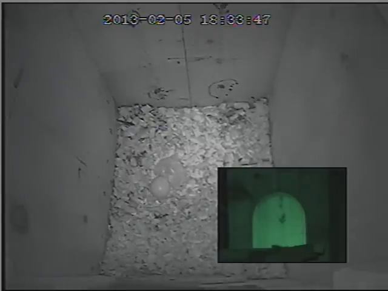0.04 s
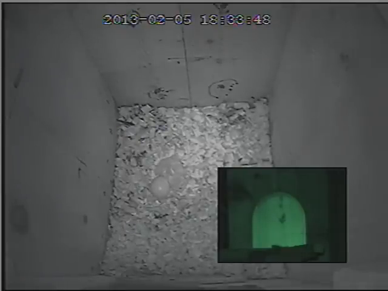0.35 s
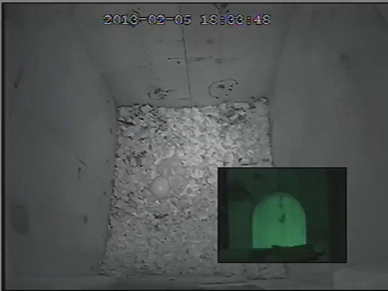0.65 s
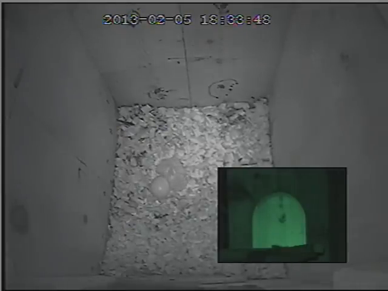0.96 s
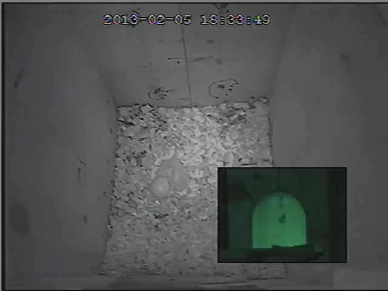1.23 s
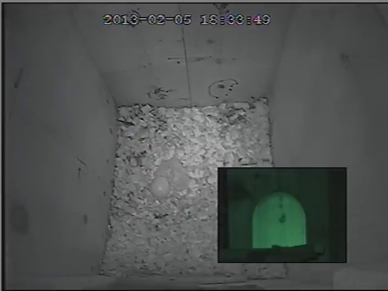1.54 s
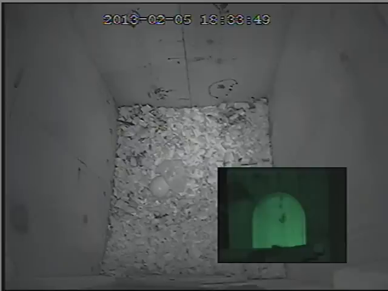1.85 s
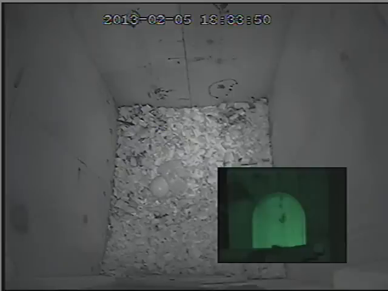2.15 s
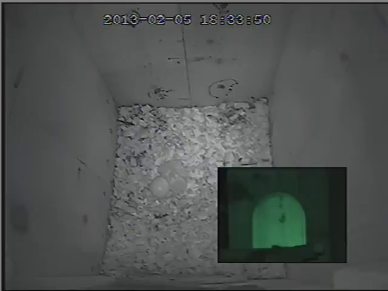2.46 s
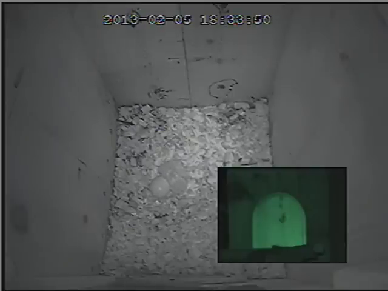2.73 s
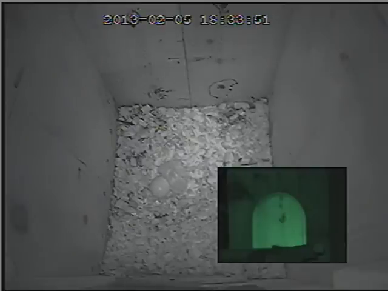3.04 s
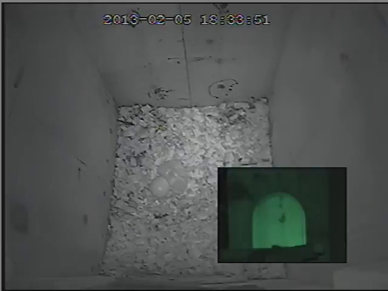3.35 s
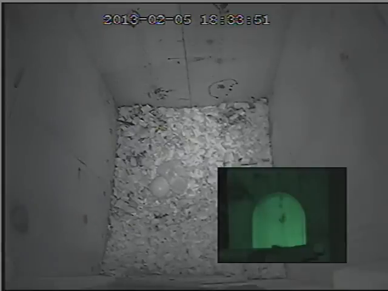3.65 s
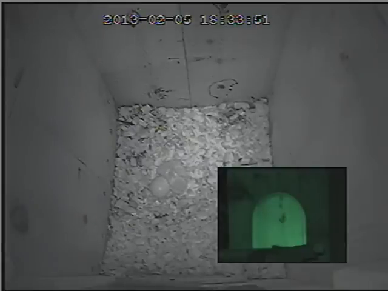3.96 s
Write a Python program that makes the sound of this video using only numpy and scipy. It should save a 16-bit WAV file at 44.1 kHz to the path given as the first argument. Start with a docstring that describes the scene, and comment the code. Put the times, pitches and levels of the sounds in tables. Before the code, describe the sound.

An owl screeches at once in a wooden nest box, a high whistle fraying into a harsh rasp and sliding down by 0.7 seconds. Feathers softly brush the wood from about 0.9 to 2.8 seconds, and a claw ticks near 3.2. A cricket gives double chirps roughly every half second throughout, over fainter crickets, soft hiss and a low distant traffic drone that slowly grows.

```python
"""An owl screeches at a wooden nest box: two whistling voices fray into a harsh rasp of air through
the throat, then one slides down cleanly. Afterwards its feathers brush the wood and a claw ticks on it.
A cricket chirps in pairs of wing strokes over a second cricket and a far chorus.
Behind them lie the low drone of distant traffic, faint whines and notes, and a soft hiss of air."""
import sys
import numpy as np
from scipy import signal
from scipy.fft import rfft, irfft
from scipy.io import wavfile
from scipy.ndimage import uniform_filter1d

SR = 44100
rng = np.random.default_rng(int(sys.argv[2]) if len(sys.argv) > 2 else 0)


def waveform_to_disk(signal):
    """Save audio, clipped to [-1, 1], as 16-bit WAV at the path in sys.argv[1]."""
    frames = np.transpose(np.atleast_2d(signal))
    scaled = np.clip(frames, -1, 1) * 32767
    samples = np.round(scaled).astype(np.int16)
    wavfile.write(sys.argv[1], SR, samples)


N = 176400
TIME = np.arange(N) / SR

# The owl's upper whistle. Each row: time in seconds, pitch in Hz, level in dB, roughness from 0 to 1.
UPPER_VOICE = [(0, 6407, -34, 0.12), (.036, 6480, -28.5, 0), (.048, 6730, -43, 0.23), (.058, 6770, -27, 0),
               (.082, 6900, -31.5, 0.11), (.11, 7090, -36.5, 0.02), (.134, 7030, -37.5, 0.24),
               (.146, 7100, -53, 0.43), (.155, 7200, -35, 0.7), (.168, 6890, -44, 0.7),
               (.2, 6810, -44, 0.38), (.24, 7240, -50.5, .5), (.275, 7260, -44.5, 0.5),
               (.287, 7600, -43, 0.54), (.34, 7530, -40.5, 0.3), (.375, 7970, -40, 0.3),
               (.41, 7190, -42, 1), (.447, 8200, -49, .6), (.483, 6780, -35, .6), (.517, 7650, -44, 0.25),
               (.56, 6900, -43, .5), (.583, 7420, -56.5, .2), (.596, 7640, -47, .12),
               (.612, 7100, -48, 0.3), (.628, 6200, -56, 0.26)]
# The lower whistle, which ends the call in a slide. Rows as for the upper one.
LOWER_VOICE = [(0, 4780, -47, .6), (.017, 4645, -41, .08), (.036, 4680, -37, .05), (.047, 4900, -42, .15),
               (.064, 4995, -36, .04), (.074, 4650, -45, .4), (.085, 4570, -35, .05), (.14, 4650, -37, .1),
               (.18, 4720, -40, .75), (.235, 4750, -44, .9), (.278, 5120, -38, .5), (.31, 4650, -42, .7),
               (.36, 5150, -48, .9), (.45, 5350, -48, .8), (.545, 5750, -54, .9), (.562, 5520, -37, .5),
               (.578, 6050, -37, .2), (.594, 6180, -46, .02), (.604, 6020, -34, .02), (.616, 5650, -37, .1),
               (.626, 5000, -30, .1), (.644, 4300, -31, .05), (.657, 3900, -24, .03),
               (.673, 3640, -35, .03), (.686, 3390, -27, .02), (.692, 3260, -33, .02),
               (.714, 3070, -38, .02)]
# Stray whistles where the voices split. One list per whistle, with rows as above.
STRAY_WHISTLES = [
    [(0, 4160, -48, 0.4), (.03, 4084, -39.5, 0), (.08, 4320, -61, .4)],
    [(.156, 8200, -52, .4), (.175, 7540, -47, .6), (.21, 7480, -48, 1.1), (.232, 7950, -52, .6),
     (.246, 7750, -52, .8), (.27, 8200, -47, .6)],
    [(.312, 6660, -53, 0.32), (.32, 6450, -44, 0.4), (.332, 5850, -48, .6), (.385, 5300, -50, .7)],
    [(.546, 6760, -54, 0.35), (.553, 6250, -39, 0.5), (.566, 5600, -37, 0.57)],
]
# The octave over the slide. Each row: time in seconds, level in dB relative to the lower voice.
SLIDE_OCTAVE = [(.6, -55), (.633, -46), (.641, -25), (.655, -35), (.675, -50)]
# The rasp's envelope. Each row: time in seconds, level in dB.
RASP_ENVELOPE = [(0, -50), (.06, -48), (.09, -58), (.14, -51.5), (.158, -46), (.235, -47.5), (.254, -38),
                 (.31, -47.5), (.33, -37.5), (.384, -42), (.412, -35), (.44, -30), (.454, -43.5),
                 (.481, -32), (.495, -35), (.514, -37), (.522, -31.5), (.538, -33.5), (.564, -33.5),
                 (.584, -61), (.6, -73), (.612, -49), (.635, -66)]
# Throat and box resonances in the rasp. Each row: centre in Hz, width in Hz, relative gain in dB.
RASP_FORMANTS = [(1290, 540, -10.5), (1783, 57, 3.5), (1890, 94, 5), (2150, 250, -1), (2510, 72, -3),
                 (2720, 41, -1), (3014, 136, -2), (3450, 140, -10), (3884, 130, -5.5), (4520, 430, -6.5),
                 (5230, 2100, -15.5), (5800, 330, -24), (7470, 670, -16.5)]
# Sharp catches in the rasp. Each row: start in seconds, peak level in dB.
CATCHES = [(.2525, -33), (.4806, -30), (.5208, -22), (.527, -29)]
# Slap off the box walls. Each row: delay in seconds, gain in dB.
BOX_ECHOES = [(.0029, -27), (.0052, -7), (0.0117, -15)]
# The hollow ring of the box. Each row: centre in Hz, width in Hz, gain in dB.
BOX_MODES = [(315, 23, -4), (459, 32, 2), (756, 38, -7), (1064, 37, -2), (1188, 50, -4.5), (1430, 35, -3.5),
             (1779, 19, -1), (2135, 23, -5), (2490, 13, -9)]

# The bird's shuffles. Each row: peak time and half length in seconds, body and scrape levels in dB.
SHUFFLES = [(0.939, 0.0045, -50.5, -64), (1.025, 0.064, -53, -60.5), (1.282, 0.0036, -65, -60),
            (1.516, 0.011, -64, -53.5), (1.531, 0.047, -48.5, -55.5), (1.625, 0.025, -51.5, -62.5),
            (1.729, 0.018, -53, -66), (1.91, 0.022, -51.5, -64), (2.066, 0.037, -56, -73),
            (2.13, 0.0065, -59.5, -64), (2.224, 0.05, -55.5, -67), (2.41, 0.017, -56, -77),
            (2.765, 0.0045, -67, -62)]
# The soft body of a shuffle. Each row: frequency in Hz, relative level in dB.
FEATHER_SPECTRUM = [(200, -3.5), (600, 4.5), (1400, 3.5), (2500, -3), (4000, -9), (7000, -36)]
# Its bright scrape. Each row: frequency in Hz, relative level in dB.
SCRAPE_SPECTRUM = [(3000, 7), (5000, 3.5), (7500, 3), (8600, -1), (10500, -12)]
# Claw on wood. Each row: start in seconds, level in dB.
CLAW_TICKS = [(3.1555, -46.5), (3.231, -39), (3.2342, -52)]
# A tick's dry attack. Each row: frequency in Hz, relative level in dB.
CRACK_SPECTRUM = [(400, -5), (1100, -10), (2000, -7), (4000, -14), (7000, -31)]
# The board's ring. Each row: pitch in Hz, level in dB relative to the tick, seconds to fall 60 dB.
WOOD_MODES = [(530, -3, 0.047), (690, -4, .012), (830, 5, 0.013), (1080, 0, .011), (1750, -3, 0.013),
              (2800, -14, 0.012)]

# The near cricket's wing strokes, two to a chirp. Each row: start in seconds, level in dB.
NEAR_STROKES = [(.312, -32), (.386, -32), (.831, -31), (.905, -33), (1.32, -32), (1.394, -33),
                (1.779, -30.5), (1.853, -31.5), (2.24, -32), (2.314, -30.5), (2.70, -32), (2.773, -33.5),
                (3.171, -32), (3.246, -32), (3.616, -33), (3.689, -32)]
# The far cricket's chirps. Each row: start in seconds, level in dB.
FAR_CHIRPS = [(1.13, -54), (1.67, -58), (2.53, -55), (3.35, -58), (3.84, -54)]
# One wing stroke. Each row: time into the stroke in seconds, pitch in Hz, relative level in dB.
STROKE_SHAPE = [(0, 4940, -5), (.003, 4930, -6), (.012, 4985, -3.3), (.022, 5020, -1.6), (.029, 5045, -4.5),
                (.034, 5010, -9), (.039, 4900, -18)]
# The wash of many far crickets. Each row: frequency in Hz, relative level in dB.
CHORUS_SPECTRUM = [(4300, -23), (4620, -12), (4780, -8), (4980, -4), (5170, -7), (5380, -11), (5600, -46.5)]

# An engine drawing nearer. Each row: time in seconds, level in dB.
ENGINE_ENVELOPE = [(0, -63), (1.1, -46.5), (1.5, -47), (2.2, -43), (2.7, -38.5), (3.2, -35.5), (4, -35.5)]
# Other traffic drones. Each row: pitch in Hz, level in dB.
TRAFFIC_HUMS = [(83, -51), (118.5, -45.5), (166.3, -46), (222, -56.5), (644, -69.5)]
# The traffic's low bed. Each row: frequency in Hz, relative level in dB.
RUMBLE_SPECTRUM = [(20, -12), (50, -13), (70, -6), (90, -2.5), (120, -6.5), (140, 1), (165, 4.5),
                   (195, -7.5), (250, -12), (340, -16.5), (500, -47.5)]
# Far-off whines. Each row: pitch in Hz, level in dB.
WHINES = [(705, -67), (1060, -70), (1215, -72)]
# Short distant notes. Each row: peak time in seconds, pitch in Hz, level in dB.
FAR_NOTES = [(2.405, 748, -56), (3.17, 770, -56)]
# The steady hiss of air. Each row: frequency in Hz, relative level in dB.
AIR_SPECTRUM = [(100, 10), (350, -1), (500, 0.5), (650, -3.5), (900, -5), (1200, -6), (1600, -9),
                (2500, -11.5), (4000, -16.5), (6000, -19), (7000, -21), (8050, -17), (8400, -28),
                (9300, -27.5), (10500, -36)]


def owl():
    """The screech: two coupled voices, stray whistles and the rasp; the final slide gains an octave."""
    upper, lower = voice(UPPER_VOICE), voice(LOWER_VOICE)
    octave = from_db(envelope(SLIDE_OCTAVE)[0]) * lower * np.exp(1j * np.angle(lower))
    # The voices multiply into a difference tone, which the throat favours.
    difference = from_db(21) * resonate((upper * np.conj(lower)).real, hz=1780, width=530)
    strays = sum(voice(rows) * (1 - until(rows[0][0])) for rows in STRAY_WHISTLES)
    whistles = (upper + lower + octave + strays).real + difference
    return box_slap(whistles) + rasp() + catches()


def voice(rows, fray_rate_hz=360, sputter_db=4.5, jitter_hz=130, top_hz=9200):
    """One side of the syrinx: a whistle that shakes, sputters and frays into noise as it roughens."""
    hz, db, roughness = envelope(rows)
    roughness = np.clip(roughness, 0, 1)
    fray = 1 + roughness * (drift(fray_rate_hz) + 1j * drift(fray_rate_hz))
    fray *= from_db(sputter_db * np.sqrt(roughness) * drift(110))
    fray /= np.sqrt(uniform_filter1d(np.abs(fray) ** 2, size=1100))  # hold the level, keep the grit
    shaky_hz = hz + roughness * jitter_hz * drift(320)
    whistle = from_db(db) * until(rows[-1][0]) * fray * tone(shaky_hz)
    return signal.sosfilt(signal.butter(10, top_hz, fs=SR, output="sos"), whistle)


def rasp(rattle_hz=122, rattle_db=1, flutter_db=0.5, band_hz=(930, 7500)):
    """Uneven puffs of chaotic airflow ring the resonances of throat and box."""
    rattle = tone(rattle_hz * (1 + 0.2 * drift(41))).real
    airflow = rng.standard_normal(N) * from_db(flutter_db * drift(110) + rattle_db * rattle)
    hiss = sum((-1) ** k * from_db(db) * resonate(airflow, hz, width)
               for k, (hz, width, db) in enumerate(RASP_FORMANTS))
    hiss = signal.sosfilt(signal.butter(4, band_hz, "band", fs=SR, output="sos"), hiss)
    hiss /= np.sqrt(uniform_filter1d(hiss ** 2, size=600))  # flatten, so the envelope sets the level
    return hiss * from_db(envelope(RASP_ENVELOPE)[0]) * until(RASP_ENVELOPE[-1][0])


def catches(ring_hz=1940, rise_s=0.0012):
    """Single hard puffs briefly ring the throat's main resonance."""
    out = np.zeros(N)
    for start, db in CATCHES:
        age = np.clip(TIME - start, 0, 1)
        puff = age / rise_s * np.exp(1 - age / rise_s)
        out += from_db(db) * puff * np.sin(2 * np.pi * ring_hz * age)
    return out


def box_slap(x):
    """Adds short reflections between the wooden walls."""
    return x + sum(from_db(db) * np.interp(TIME - delay, TIME, x, left=0) for delay, db in BOX_ECHOES)


def box_ring(x):
    """The box's resonances turn a noise hollow; unit power."""
    return unit_power(x + sum(from_db(db) * resonate(x, hz, width) for hz, width, db in BOX_MODES))


def shuffles(grain_db=2.5):
    """Feathers brush the wood in soft, grainy swells, some with a bright scrape."""
    grain = unit_power(from_db(grain_db * drift(180)))
    body, scrape = box_ring(noise(FEATHER_SPECTRUM)), noise(SCRAPE_SPECTRUM)
    return grain * sum(swell(peak, half) * (from_db(body_db) * body + from_db(scrape_db) * scrape)
                       for peak, half, body_db, scrape_db in SHUFFLES)


def claw(crack_db=-5.5, crack_t60_s=0.018):
    """A claw taps the board: a dry crack and a short woody ring."""
    out, crack = np.zeros(N), noise(CRACK_SPECTRUM)
    for start, db in CLAW_TICKS:
        age = np.clip(TIME - start, 0, 1)
        out += (age > 0) * from_db(db + crack_db - 60 * age / crack_t60_s) * crack
        out += sum(from_db(db + mode_db - 60 * age / t60) * np.sin(2 * np.pi * hz * age)
                   for hz, mode_db, t60 in WOOD_MODES)
    return out


def crickets(far_gap_s=0.075, chorus_db=-57, throb_db=1.5):
    """A near cricket, a slightly lower one far off and the throbbing blur of many more."""
    far_strokes = [(start + k * far_gap_s, db) for start, db in FAR_CHIRPS for k in range(2)]
    chorus = from_db(chorus_db + throb_db * drift(6.4)) * noise(CHORUS_SPECTRUM)
    return cricket(NEAR_STROKES, pitch_ratio=1) + cricket(far_strokes, pitch_ratio=0.95) + chorus


def cricket(strokes, pitch_ratio, fade_s=0.003, jitter_hz=7.9, wobble_db=0.37):
    """Each wing stroke is a short, slightly rising tone, trailed by its echo from the garden."""
    chirps = np.zeros(N + SR)
    age = np.arange(int(STROKE_SHAPE[-1][0] * SR)) / SR
    hz, shape_db = envelope(STROKE_SHAPE, age)
    fades = np.sin(np.pi / 2 * np.clip(np.minimum(age, age[-1] - age) / fade_s, 0, 1)) ** 2
    jitter = jitter_hz * drift(100)
    for start, db in strokes:
        span = int((start - fade_s / 2) * SR) + np.arange(len(age))
        chirps[span] += fades * from_db(db + shape_db) * tone(hz * pitch_ratio + jitter[span % N]).real
    chirps = chirps[:N] * from_db(-wobble_db * drift(150))
    return chirps + garden_echo(chirps, hz.mean() * pitch_ratio)


def garden_echo(chirps, hz, wet_db=-11, t60_s=0.25, blur_hz=70):
    """A diffuse tail: narrow noise at the cricket's pitch dies away after each stroke."""
    decay = from_db(-60 / (t60_s * SR)) ** 2
    tail = np.sqrt(signal.lfilter([1 - decay], [1, -decay], chirps ** 2 + 1e-18))
    scatter = tone(np.full(N, hz)) * (drift(blur_hz) + 1j * drift(blur_hz))
    return from_db(wet_db) * tail * unit_power(scatter.real)


def traffic(engine_hz=109.3, swell_db=2, wander_hz=1.418, rumble_db=-43):
    """Wavering engine drones over a low rumble; one engine draws nearer."""
    engine = from_db(envelope(ENGINE_ENVELOPE)[0]) * tone(engine_hz + 0.52 * drift(1.5)).real
    hums = sum(from_db(db + swell_db * drift(7.7)) * tone(hz + wander_hz * drift(2.82)).real
               for hz, db in TRAFFIC_HUMS)
    return engine + hums + from_db(rumble_db) * noise(RUMBLE_SPECTRUM)


def far_tones(swell_db=3.5, wander_hz=7):
    """Faint whines come and go, and two short notes sound far away."""
    whines = sum(from_db(db + swell_db * np.tanh(drift(2.4))) * tone(hz + wander_hz * drift(2.01)).real
                 for hz, db in WHINES)
    notes = sum(from_db(db) * swell(peak, half_s=0.019) * tone(np.full(N, hz)).real
                for peak, hz, db in FAR_NOTES)
    return whines + notes


def air(level_db=-51):
    """A steady bed of hiss, coloured by the box."""
    return from_db(level_db) * box_ring(noise(AIR_SPECTRUM))


def from_db(db):
    """Decibels to gain."""
    return 10 ** (np.asarray(db) / 20)


def unit_power(x):
    """Scales a signal to an RMS of 1."""
    return x / np.sqrt(np.mean(x ** 2) + 1e-20)


def envelope(rows, t=TIME):
    """Straight ramps between timed breakpoints, one curve per value column."""
    times, *columns = np.transpose(rows)
    return [np.interp(t, times, column) for column in columns]


def until(end_s):
    """A gate that closes with a 10 ms fade."""
    return np.clip((end_s - TIME) / 0.01, 0, 1)


def swell(peak_s, half_s):
    """A bell-shaped fade in and out."""
    return np.exp(-0.5 * ((TIME - peak_s) / half_s) ** 2)


def drift(rate_hz):
    """Smooth random modulation, mostly slower than the given rate; unit power."""
    freqs = np.fft.rfftfreq(N, 1 / SR)
    return unit_power(irfft(rfft(rng.standard_normal(N)) / (1 + (freqs / rate_hz) ** 2), N))


def noise(spectrum):
    """Noise of a given colour, rolling off steeply beyond its ends; unit power."""
    hz, db = np.transpose(spectrum)
    freqs = np.fft.rfftfreq(N, 1 / SR) + 1e-3
    colour = from_db(np.interp(np.log(freqs), np.log(hz), db))
    skirts = np.minimum(1, np.minimum(freqs / hz[0], hz[-1] / freqs)) ** 4
    return unit_power(irfft(rfft(rng.standard_normal(N)) * colour * skirts, N))


def tone(hz):
    """A complex oscillator following a pitch curve; its real part has unit power."""
    return np.sqrt(2) * np.exp(2j * np.pi * (np.cumsum(hz) / SR + rng.random()))


def resonate(x, hz, width):
    """A resonant band-pass with unity gain at its peak."""
    radius = np.exp(-np.pi * width / SR)
    feedforward = np.array([1, 0, -1]) * (1 - radius ** 2) / 2
    feedback = [1, -2 * radius * np.cos(2 * np.pi * hz / SR), radius ** 2]
    return signal.lfilter(feedforward, feedback, x)


def scene():
    """The mono mix: the bird at its box, crickets and the evening background."""
    return (owl() + claw() + shuffles() + crickets() + traffic() + far_tones() + air())[None]


def record(dry):
    """A small microphone cuts the top end steeply."""
    cutoff_hz = 10700
    return signal.sosfilt(signal.ellip(10, 0.2, 70, cutoff_hz, fs=SR, output="sos"), dry)


dry = scene()
out = record(dry)
waveform_to_disk(out)
```